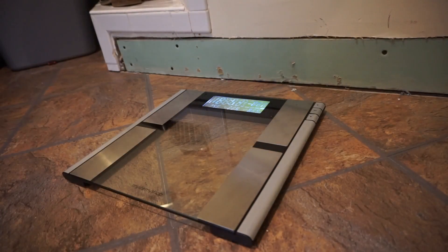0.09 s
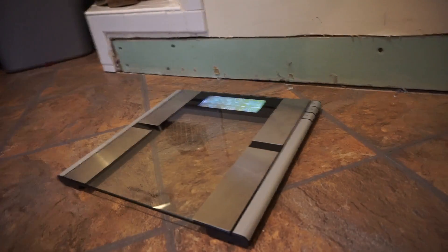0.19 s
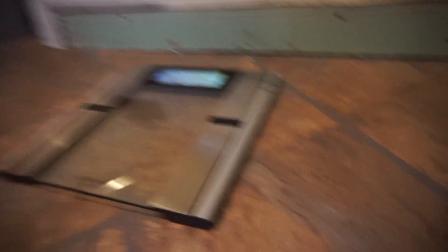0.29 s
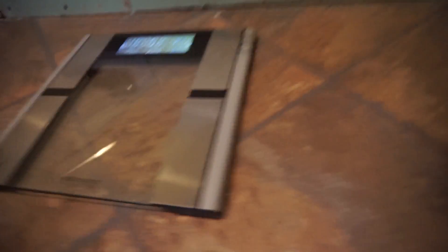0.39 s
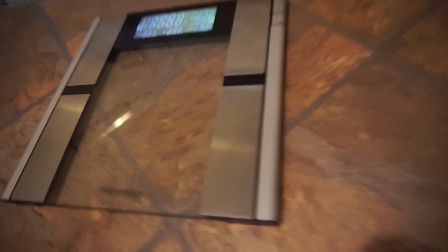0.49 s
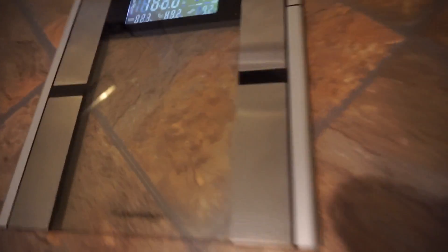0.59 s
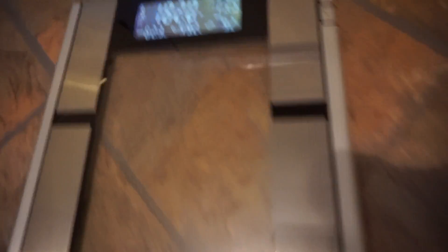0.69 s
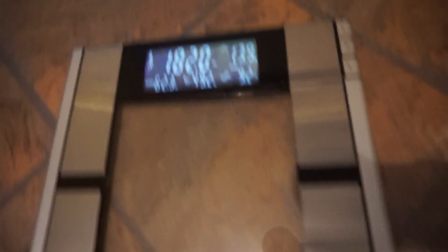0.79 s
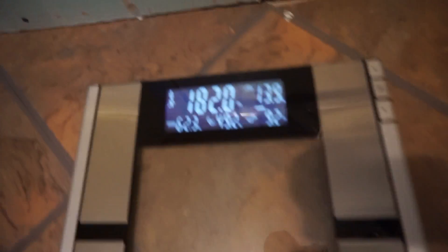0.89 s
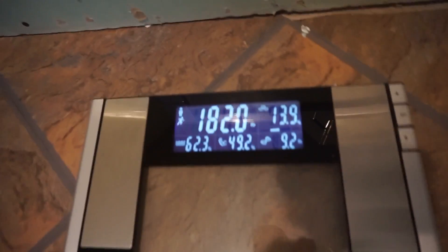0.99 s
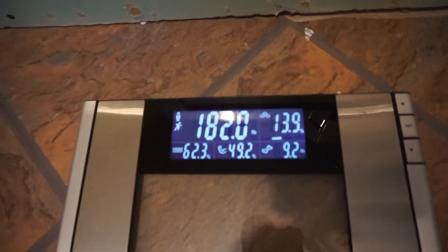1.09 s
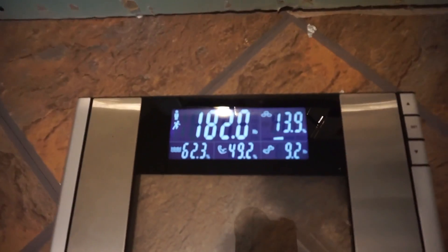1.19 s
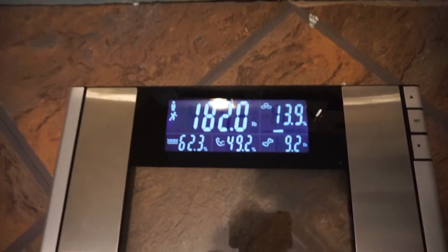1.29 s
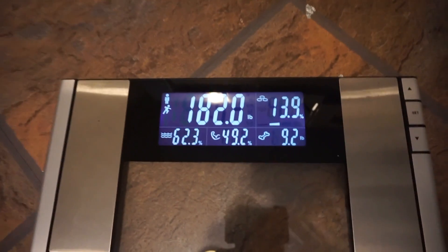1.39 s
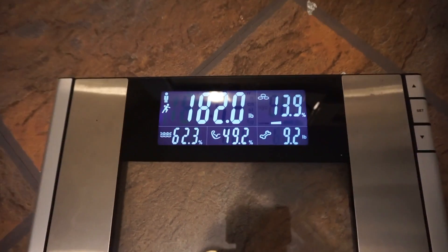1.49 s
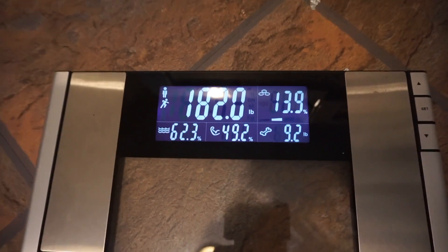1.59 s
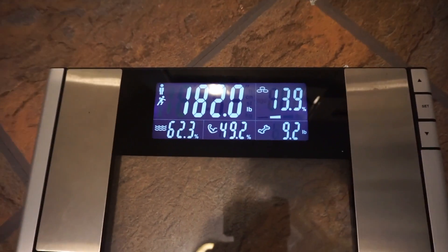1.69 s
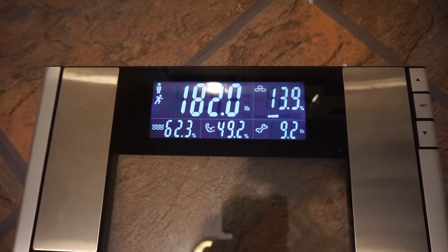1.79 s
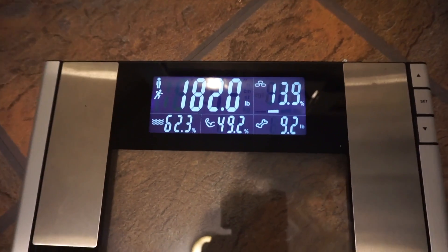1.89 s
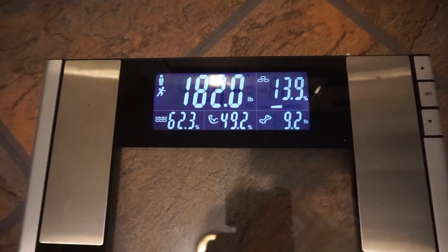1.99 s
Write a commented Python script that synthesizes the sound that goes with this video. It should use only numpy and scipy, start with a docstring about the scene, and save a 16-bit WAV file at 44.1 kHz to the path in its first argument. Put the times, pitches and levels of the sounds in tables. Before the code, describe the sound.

Hollow knocks clatter on a plastic casing close to the microphone, with sharp clicks and light rubbing. One more knock, a tick and a faint falling whirr follow, then soft taps, with tiled room echo and steady hiss.

```python
"""Hollow knocks clatter on a plastic casing close to the microphone, like a camera being handled.
Each blow rings the casing briefly; hard contacts add sharp clicks, and sliding surfaces a light rubbing.
One more knock, a ringing tick and a faint falling whirr follow, then only soft taps.
The tiled room rings on behind them over a steady hiss, and a gain control turns down the loudest knocks."""
import sys
import numpy as np
from scipy import signal
from scipy.fft import irfft
from scipy.io import wavfile
from scipy.ndimage import uniform_filter1d

SR = 44100
rng = np.random.default_rng(int(sys.argv[2]) if len(sys.argv) > 2 else 0)


def transcribe(u):
    """Save the signal u as a 16-bit wav file named by the first command-line argument.

    u: samples, shape (n,) or (channels, n), limited to [-1, 1]; the rate is SR.
    q: integer samples, one column per channel.
    """
    v = np.clip(np.atleast_2d(u).T, -1, 1)
    q = np.round(v * 32767).astype(np.int16)
    wavfile.write(sys.argv[1], SR, q)


N = 88200

# Tone colour of the hiss; a colour says how strong each pitch is next to the others (f/Hz, level/dB)
HISS_COLOUR = [(15, -72), (25, -42), (161, -23), (206, -26.5), (363, -13), (463, -15.5), (641, -7),
               (775, -7.5), (1400, -2), (1610, -8.5), (2220, -10.5), (3080, -8.5), (4740, -12.5),
               (12900, -15), (16000, -21.5)]
# How alike the hiss is left and right, 1 being the same (f/Hz, likeness)
HISS_LIKENESS = [(60, .3), (290, 0.28), (640, -0.23), (1400, -0.056), (15000, 0.18)]
# Echo of the tiled room; t60 is the time to fade by 60 dB (f/Hz, level/dB, t60/s)
ROOM_ECHO = [(60, -2.5, 1), (129, -2, 0.64), (250, -8, 0.54), (500, -22, 1), (1000, -16, 0.94),
             (2020, -13, 1), (4000, -13.5, 1), (7940, -18.5, 1), (16000, -30, .25)]
# How alike the echo and the rattle are left and right (f/Hz, likeness)
ROOM_LIKENESS = [(60, 0.75), (250, 0.76), (700, 0.71), (1400, 0.22), (3000, 0), (15000, 0.24)]
# Path of the whirr's falling tone (t/s, f/Hz, level/dB)
WHIRR_PATH = [(.785, 730, -75), (0.801, 701, -48.5), (0.826, 617, -53), (.84, 572, -53),
              (.87, 579.4, -61.5), (0.932, 561, -70)]
# Colour of the buzz around that tone (f/Hz, level/dB)
BUZZ_COLOUR = [(180, -37), (370, -2), (700, 2.5), (1600, 3.5), (2300, -5.5), (3100, 0), (3700, -3.5),
               (4300, 0.5), (5200, -12), (15000, -22)]
# How the rubbing swells and fades (t/s, level/dB)
RUB_LEVELS = [(.31, -70), (.34, -49), (.38, -42), (.42, -43.5), (.46, -46.5), (.51, -58), (.58, -61)]
# Colour of the rubbing (f/Hz, level/dB)
RUB_COLOUR = [(100, -17), (1000, -9), (2500, 6.5), (4500, 2.5), (7000, -3.5), (9500, -3.5), (12000, -14),
              (16000, -15)]
# Plastic clicks (t/s, level/dB, favoured f/Hz, t60/s)
CLICKS = [(0.212, -27, 2070, 0.024), (0.2291, -27.5, 4500, 0.024), (0.2475, -16, 6560, 0.019),
          (0.2679, -13, 8600, 0.015), (0.314, -23, 6500, 0.01), (0.3171, -26.5, 3000, 0.058),
          (0.3214, -10, 7800, 0.013), (0.3355, -22, 5000, 0.012), (0.3537, -16.5, 3000, 0.007),
          (0.356, -32.5, 8900, 0.034), (0.421, -36, 5000, 0.01), (0.4695, -47, 6900, 0.012),
          (.4970, -32, 4980, 0.0093), (0.6702, -43, 5000, 0.022), (.7887, -30.5, 2300, 0.016)]
# Colour shared by the clicks (f/Hz, level/dB)
CLICK_COLOUR = [(100, -16), (500, -1), (1200, 2.5), (2200, -2.5), (4000, 0.5), (5500, -1.5), (7700, -0.5),
                (11000, -4.5), (16000, -6.5)]
# The tick's modes, the tones it rings with (f/Hz, level/dB, base t60/s, left minus right/dB)
TICK_MODES = [(1855, -33, 0.036, 2.3), (3130, -26, 0.021, 7.5), (3400, -40, 0.018, 2)]
# Modes of the plastic casing (f/Hz, level/dB, base t60/s, left minus right/dB)
CASING_MODES = [(295, -24, 0.017, -1), (348, -13.5, 0.024, -11), (469, -10.5, 0.024, -5),
                (597, -9.5, 0.024, -3.5), (695, -10, 0.023, -3.5), (1105, -9, 0.024, -10.5),
                (1234, -4.5, 0.021, -1.5), (1419, -7, 0.027, -4.5), (1765, -10.5, 0.037, 4),
                (2714, -6.5, 0.021, 7), (3000, -14.5, 0.0086, 19.5)]
# Colour of the rattle from the casing's crowded upper modes (f/Hz, level/dB)
RATTLE_COLOUR = [(30, 20.5), (120, -11), (300, 1.5), (700, 0), (920, -2), (1300, 1), (2300, -3.5),
                 (3200, 1.5), (4500, -16), (8000, -16), (16000, -32)]
# Knocks and soft taps (t/s, level/dB, favoured f/Hz, spread/octaves, ring length factor)
KNOCKS = [(.155, -48.5, 1300, 1, 0.8), (0.2209, -27.5, 1500, 1.2, 1.7), (0.23, -18, 1300, 1.6, 0.66),
          (0.2331, -10.5, 2400, 1.34, 1.5), (.2357, -9, 600, 1.65, 1.56), (0.2413, -11.5, 670, 1.06, 1.96),
          (.2438, -5.5, 1080, 0.95, 0.64), (0.2476, -12, 450, 0.72, 0.91), (0.251, -17, 2380, 0.95, 1),
          (.2563, -16, 1300, 1.1, 1.5), (0.2606, -19.5, 1400, 1.3, 0.57), (.2640, -14, 736, 1.3, 0.84),
          (0.2973, -11.5, 1400, 0.3, 0.94), (.3037, -18.5, 654, 0.71, 0.95),
          (0.3202, -16.5, 2070, 0.84, 1.47), (0.3383, -11, 1240, 0.71, 0.99), (.3428, -12, 610, 0.83, 1.18),
          (0.3538, -11, 626, 0.71, 1.08), (0.3805, -12.5, 1430, 0.92, 0.7), (0.3844, -9.5, 560, 1.1, 0.78),
          (0.3883, -20, 650, 0.86, 0.97), (0.3941, -10.5, 550, 0.9, 1.1), (.5408, -26, 556, 0.73, 0.98),
          (.6060, -36, 920, 1, 1.2), (.7166, -13.5, 553, 0.89, 0.69), (0.7252, -23, 504, 0.93, 1.1),
          (.992, -42.5, 1400, .8, 1), (1.037, -44, 1070, .7, 1.9), (1.3735, -38, 1450, 0.3, 0.63),
          (1.393, -45.5, 1420, 0.41, 1.3), (1.461, -44, 1520, 0.61, 1.3), (1.8641, -39.5, 1460, 0.38, 1.45)]


def gain(db):
    """Turns decibels into a factor to multiply by."""
    return 10 ** (np.asarray(db) / 20)


def look_up(table, hz, column=1):
    """Reads between a table's rows along a pitch (log-frequency) axis."""
    rows = np.array(table, float)
    return np.interp(np.log(hz + 1), np.log(rows[:, 0] + 1), rows[:, column])


def add(mix, start_s, sound):
    """Mixes a stereo sound in at its start time."""
    part = mix[:, max(round(start_s * SR), 0):][:, :sound.shape[1]]
    part += sound[:, :part.shape[1]]


def pan(db):
    """Left and right gains that put the left side db above the right."""
    return gain(np.array([[db], [-db]]) / 2)


def noise(colour, size, likeness=None, weight=lambda hz: 1):
    """Stereo noise of strength (rms) 1 with a given colour and left-right likeness."""
    hz = np.fft.rfftfreq(size, 1 / SR)
    left, other = np.exp(2j * np.pi * rng.random((2, len(hz))))
    shared = np.clip(look_up(likeness, hz), -1, 1) if likeness else 0
    right = shared * left + np.sqrt(1 - shared ** 2) * other
    sound = irfft(np.array([left, right]) * gain(look_up(colour, hz)) * weight(hz), size)
    return sound / sound.std()


def favour(hz, centre_hz, octaves):
    """A broad hump around one pitch: each knock or click has its own favoured pitch."""
    return 1 / (1 + (np.log2((hz + 1) / centre_hz) / octaves) ** 2)


def fade(t, t60):
    """Dies away by 60 dB every t60 seconds."""
    return np.exp(-np.log(1000) * t / t60)


def strike(t, t60, contact_s=0.00027):
    """The loudness of a blow: a fast rise, then a fade."""
    return (1 - np.exp(-t / contact_s)) * fade(t, t60)


def ring(modes, t, length, detune=0.03, skew_rad_per_hz=1.04 / 3000):
    """One fading tone per mode, new at each blow; high tones are more out of step left and right."""
    tones = []
    for hz, db, t60, pan_db in modes:
        shift, skew = rng.standard_normal(2)
        phase = 2 * np.pi * hz * (1 + detune * shift) * t
        lead = np.array([[1], [-1]]) * skew * skew_rad_per_hz * hz
        tones.append(gain(db) * pan(pan_db) * strike(t, t60 * length) * np.sin(phase + lead))
    return np.array(tones)


def hiss(level_db=-54.5):
    """A soft, steady hiss behind everything."""
    return gain(level_db) * noise(HISS_COLOUR, N, HISS_LIKENESS)


def room_echo(sound, early_db=-15.5, early_t60=0.1, delay_s=0.013):
    """Sound bounces off the tiles: quick early echoes, then a tail where each pitch has its own fade."""
    white = noise([(20, 0), (20000, 0)], SR, ROOM_LIKENESS)
    hz, t, bands = signal.stft(white, SR, nperseg=256)
    t60 = look_up(ROOM_ECHO, hz, column=2)[:, None]
    late = fade(t, t60) / np.sqrt(t60) * gain(look_up(ROOM_ECHO, hz))[:, None]
    early = fade(t, early_t60) / np.sqrt(early_t60) * gain(early_db)
    echo = signal.istft(bands * np.hypot(late, early), SR, nperseg=256)[1]
    echo *= np.sqrt(2 * np.log(1000) / SR)  # the levels now stand for total energy
    echo *= np.clip(np.arange(echo.shape[1]) / SR / delay_s - .5, 0, 1)  # half faded in at delay_s
    blended = (sound.mean(0) + sound) / 2
    return signal.fftconvolve(blended, echo, axes=1)[:, :N]


def whirr(wobble_depth=0.0375, overtone_ratio=2.45, overtone_db=-4.5, buzz_db=-49):
    """A faint, unsteady tone and its overtone sink in pitch inside a short buzz."""
    t = np.arange(N) / SR
    times, hz, db = np.transpose(WHIRR_PATH)
    wobble = uniform_filter1d(rng.standard_normal(N), size=300)
    pitch_hz = np.interp(t, times, hz) * (1 + wobble_depth * wobble / wobble.std())
    phase = 2 * np.pi * np.cumsum(pitch_hz) / SR
    loudness = gain(np.interp(t, times, db)) * (t > times[0]) * (t < times[-1])
    tone = np.sin(phase) + gain(overtone_db) * np.sin(overtone_ratio * phase)
    buzz_swell = np.interp(t, [0.787, 0.797, 0.87, 0.99], [0, 1, 1, 0])
    return loudness * tone + gain(buzz_db) * buzz_swell * noise(BUZZ_COLOUR, N)


def rubbing(slips_per_s=420, grain_s=0.002):
    """Surfaces slide lightly: each tiny random slip gives a grain of bright noise."""
    t = np.arange(N) / SR
    slips = (rng.random(N) < slips_per_s / SR) * rng.exponential(1, N)
    grains = 1 + signal.lfilter([1], [1, -np.exp(-1 / (grain_s * SR))], slips)
    grains /= np.sqrt(np.mean(grains ** 2))
    times, db = np.transpose(RUB_LEVELS)
    loudness = gain(np.interp(t, times, db)) * (t > times[0]) * (t < times[-1])
    return loudness * grains * noise(RUB_COLOUR, N)


def plastic_clicks(octaves=1.12, pan_db=-2, tick_at_s=0.7888):
    """Hard plastic contacts: crowded bright modes that die in milliseconds, and one ringing tick."""
    out, t = np.zeros((2, N)), np.arange(2048) / SR
    for start_s, db, hz, t60 in CLICKS:
        burst = noise(CLICK_COLOUR, len(t), weight=lambda f: favour(f, hz, octaves))
        add(out, start_s, gain(db) * pan(pan_db) * burst * strike(t, t60))
    add(out, tick_at_s, ring(TICK_MODES, t, length=0.85).sum(0))
    return out


def casing_knocks(rattle_base_db=-8.5, rattle_base_t60=0.031, low_cut_hz=340, thud_db=-37.5):
    """Each blow makes the plastic casing ring and rattle; so small a body gives off little bass."""
    out, t = np.zeros((2, N)), np.arange(4096) / SR
    for start_s, db, hz, octaves, length in KNOCKS:
        mode_strengths = favour(np.array(CASING_MODES)[:, 0], hz, octaves)
        body = np.tensordot(mode_strengths, ring(CASING_MODES, t, length), 1)
        rattle = noise(RATTLE_COLOUR, len(t), ROOM_LIKENESS, lambda f: favour(f, hz, octaves) ** .5)
        rattle *= gain(rattle_base_db) * octaves * strike(t, rattle_base_t60 * length)
        add(out, start_s, gain(db) * (body + rattle))
    bass_cut = signal.butter(2, low_cut_hz, "highpass", fs=SR, output="sos")
    return signal.sosfilt(bass_cut, out) + gain(thud_db) * out  # a faint thud gets past the cut


def scene():
    """The sounds close to the microphone, their echo in the room, and the hiss."""
    close = casing_knocks() + plastic_clicks() + rubbing() + whirr()
    return close + room_echo(close) + hiss()


def record(dry, limit_db=-23, cut_share=0.27, fall_db_per_s=133, top_hz=16100):
    """A gain control dips the level at the loudest knocks; then the highest treble is cut."""
    power = uniform_filter1d((dry ** 2).mean(0), size=200)
    power_db = 10 * np.log10(abs(power) + 1e-12)
    fall_db = np.arange(N) / SR * fall_db_per_s
    peak_db = np.maximum.accumulate(power_db + fall_db) - fall_db  # jumps up, sinks steadily
    over_db = np.maximum(peak_db - limit_db, 0)
    dipped = dry * gain(-cut_share * uniform_filter1d(over_db, size=100))
    treble_cut = signal.firwin(255, top_hz, window=("kaiser", 9), fs=SR)
    return signal.oaconvolve(dipped, treble_cut[None], "same")


dry = scene()
out = record(dry)
transcribe(out)
```